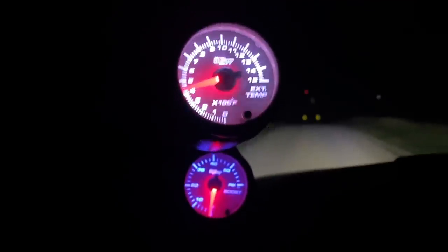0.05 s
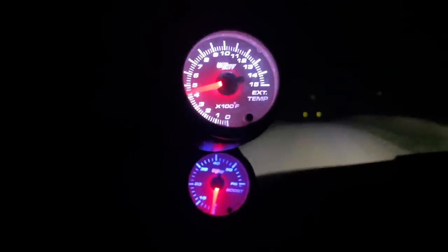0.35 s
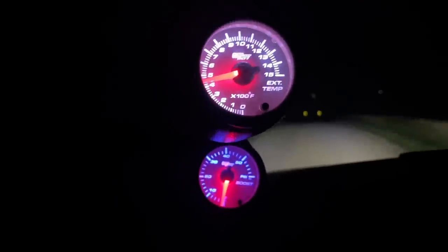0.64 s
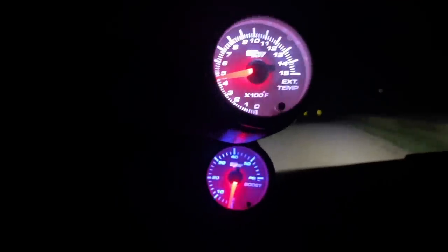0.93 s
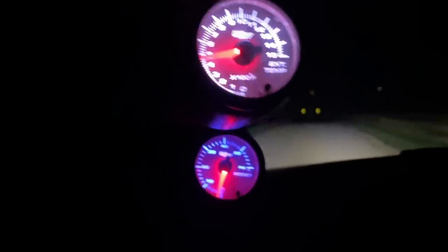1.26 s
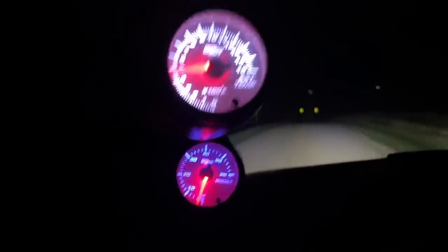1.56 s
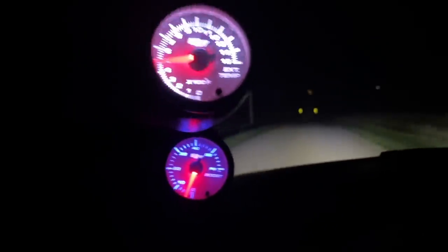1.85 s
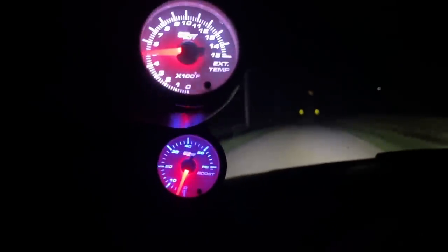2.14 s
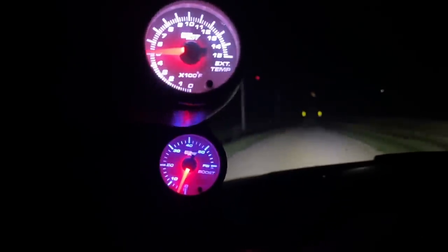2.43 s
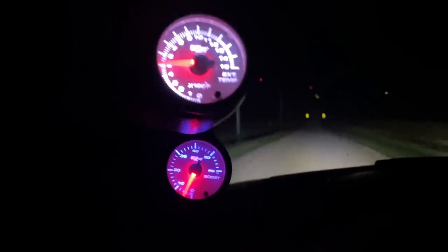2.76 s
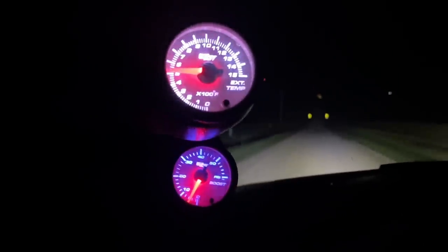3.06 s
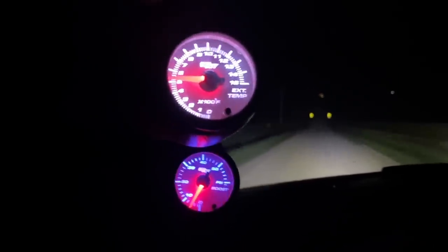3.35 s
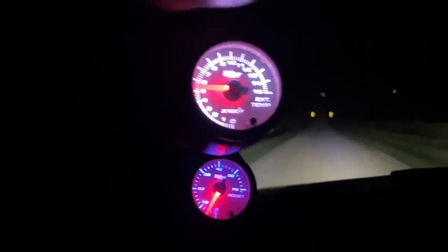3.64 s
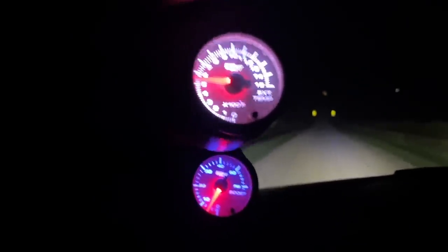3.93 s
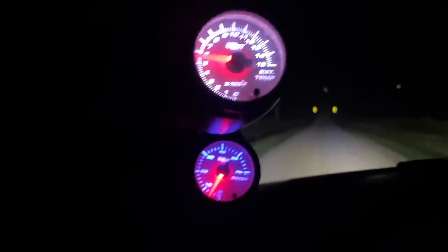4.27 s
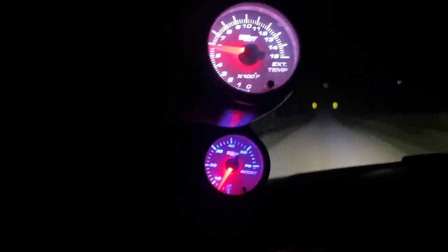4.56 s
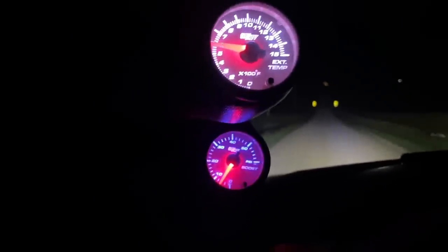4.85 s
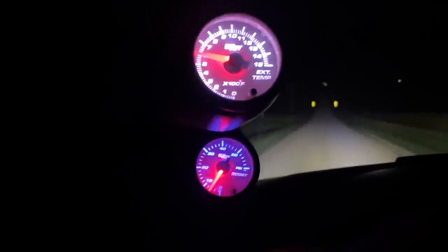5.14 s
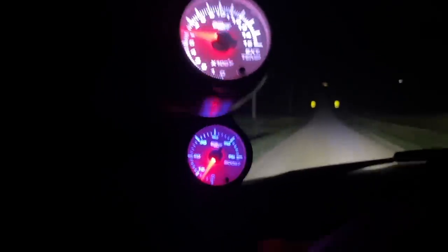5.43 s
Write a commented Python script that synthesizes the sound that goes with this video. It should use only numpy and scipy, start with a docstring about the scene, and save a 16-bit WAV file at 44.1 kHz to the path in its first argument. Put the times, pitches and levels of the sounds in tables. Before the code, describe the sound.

A diesel pickup drones deeply under load, heard from the cab over road rumble, while a faint turbo whistle climbs and levels off.

```python
"""Inside the cab of a six-cylinder turbo diesel pickup pulling along a road.
From the start the exhaust drones at the firing rate and keeps a limiter busy; unequal cylinders growl,
combustion clatters through the firewall, tyres rumble and the turbo whistle climbs. Plastic trim ticks
four times between 0.6 and 2.3 s, and rough road swells the boom near 1.5 s. The load grows while the
revs sag; near 5 s they pick up and the whistle levels off."""
import sys
import numpy as np
from scipy import signal
from scipy.fft import rfft, irfft
from scipy.io import wavfile
from scipy.ndimage import uniform_filter1d, minimum_filter1d

SR = 44100
rng = np.random.default_rng(int(sys.argv[2]) if len(sys.argv) > 2 else 0)


def unload_wav(signal):
    """Save mono or channel-first audio to the path in sys.argv[1] as 16-bit WAV at rate SR, clipped to [-1, 1]."""
    wavfile.write(
        sys.argv[1],
        SR,
        np.round(np.clip(np.atleast_2d(signal).T, -1, 1) * 32767).astype(np.int16),
    )


N = 242550
TIME_S = np.arange(N) / SR
BIN_HZ = np.maximum(np.arange(N // 2 + 1) * SR / N, 1)
CYLINDERS = 6


def from_db(db):
    """Decibels to gain."""
    return 10 ** (np.asarray(db) / 20)


def unit_rms(x):
    """Scale to unit power."""
    return x / np.sqrt(np.mean(x ** 2) + 1e-20)


def per_sample(rows):
    """Columns of a time table at every sample."""
    time_s, *columns = np.transpose(rows)
    return [np.interp(TIME_S, time_s, c) for c in columns]


def per_bin(rows):
    """Columns of a frequency table at every FFT bin, joined on a log axis."""
    hz, *columns = np.transpose(rows)
    return [np.interp(np.log(BIN_HZ), np.log(hz), c) for c in columns]


def pan(db):
    """Stereo gains for a left-minus-right level."""
    return from_db(np.array([[.5], [-.5]]) * db)


def drift(rate_hz):
    """Slow random wander, unit RMS."""
    return unit_rms(irfft(rfft(rng.standard_normal(N)) / (1 + (BIN_HZ / rate_hz) ** 2), N))


def skirts_db(low_hz, high_hz):
    """Steep roll-off either side of a band."""
    return -10 * np.log10(1 + (low_hz / BIN_HZ) ** 10 + (BIN_HZ / high_hz) ** 10)


def resonance(x, hz, width_hz):
    """Two-pole resonator, unity peak gain."""
    r = np.exp(-np.pi * width_hz / SR)
    feedback = [1, -2 * r * np.cos(2 * np.pi * hz / SR), r * r]
    return signal.lfilter(np.array([1, 0, -1]) * (1 - r * r) / 2, feedback, x)


# Cab sound field: (frequency [Hz], left-right coherence [0..1])
CAB_COHERENCE = [(60, .998), (100, .99), (180, .94), (300, .5), (500, 0), (1200, .15), (2600, .5),
                 (5000, .4), (9500, .05)]

def cab_noise(density_db=0, pan_db=0):
    """Stereo noise of a given density per Hz: coherent in the bass, diffuse above."""
    coherence, = per_bin(CAB_COHERENCE)
    mid, side = rfft(rng.standard_normal((2, N))) * np.sqrt(SR) / 2
    pair = np.sqrt(1 + coherence) * mid + np.sqrt(1 - coherence) * side * [[1], [-1]]
    return irfft(pair * from_db(density_db) * pan(pan_db), N)


# Road and wind spectrum: (frequency [Hz], relative density [dB], pan [dB])
ROAD_SPECTRUM = [(180, -48, 3), (280, -53, 2), (380, -57.5, 2.5), (520, -64.5, 5), (820, -67.5, 5),
                 (1150, -74, 0), (1700, -78, 1), (2600, -84, 2), (3400, -88, 3), (4300, -89.5, 3),
                 (7800, -96, 1.5), (10000, -93, 0), (11800, -100, 0)]

def road_and_wind(load_db):
    """Broad rush that grows as the truck pulls harder."""
    density_db, pan_db = per_bin(ROAD_SPECTRUM)
    return from_db(-.4 + .3 * load_db) * cab_noise(density_db + skirts_db(140, 12600), pan_db)


# Tyre boom spectrum: (frequency [Hz], relative density [dB])
BOOM_SPECTRUM = [(16, -56), (24, -51.5), (33, -51.5), (39, -45), (47, -34.5), (57, -34.5), (67, -30),
                 (80, -35), (92, -37), (125, -43), (175, -50.5)]
# Rough road: (time [s], half length [s], boost [dB])
ROUGH_PATCHES = [(1.547, .12, 2), (1.9, .2, 0.5), (3.5, .1, 0)]

def tyre_rumble(start_db=-2.5, rise_db_per_s=.79):
    """Tyre boom grows with road speed and swells over rough patches."""
    density_db, = per_bin(BOOM_SPECTRUM)
    boom = cab_noise(density_db + skirts_db(9, 230), pan_db=1.7)
    power = uniform_filter1d(np.mean(boom ** 2, axis=0), size=SR // 2)
    steady_boom = boom * np.sqrt(power.mean() / power)
    swell_db = sum(db * np.exp(-((TIME_S - at_s) / half_s) ** 2) for at_s, half_s, db in ROUGH_PATCHES)
    return from_db(start_db + rise_db_per_s * TIME_S + swell_db) * steady_boom


# Trim slips: (time [s], relative level [dB])
TRIM_SLIPS = [(0.612, -39), (1.6876, -36.5), (2.0517, -48), (2.2322, -45.5)]
# Trim resonances: (frequency [Hz], width [Hz], gain [dB])
TRIM_MODES = [(2900, 900, -13), (4800, 700, -15), (6400, 600, -7), (7300, 900, -5), (10000, 1700, 0)]

def trim_ticks(crack_s=.0014, rustle_s=.007, rustle_db=-10):
    """Plastic trim slips: a sharp crack and a short rustle through its resonances."""
    envelope = np.zeros(N)
    for at_s, level_db in TRIM_SLIPS:
        age_s = np.maximum(TIME_S - at_s, 0)
        decay = np.exp(-age_s / crack_s) + from_db(rustle_db) * np.exp(-age_s / rustle_s)
        envelope += (TIME_S >= at_s) * from_db(level_db) * decay
    friction = from_db(9.5) * envelope * rng.standard_normal((2, N))
    return sum(from_db(db) * resonance(friction, hz, width_hz) for hz, width_hz, db in TRIM_MODES)


def intake_hiss(centre_hz, half_width_hz=430):
    """Air rushing through the compressor: a noise band that follows shaft speed."""
    mean_hz = centre_hz.mean()
    band = cab_noise(-10 * np.log10(1 + ((BIN_HZ - mean_hz) / half_width_hz) ** 4))
    shift_turns = np.cumsum(centre_hz - mean_hz) / SR
    return unit_rms(np.real(signal.hilbert(band) * np.exp(2j * np.pi * shift_turns)))


def blade_tone(hz, jitter_hz, flutter):
    """Tone of a trembling shaft; each channel gets its own changing mix of reflections."""
    turns = np.cumsum(hz + jitter_hz * drift(33)) / SR
    paths = np.array([1 + flutter * (drift(16) + 1j * drift(15)) for _ in range(2)])
    return unit_rms(np.real(paths * np.exp(2j * np.pi * turns)))


# Intake pipe resonances: (frequency [Hz], half width [Hz], peak level [dB])
INTAKE_MODES = [(5325, 22, -57.5), (5432, 20, -58.5), (5530, 12, -62), (5665, 60, -57), (5848, 13, -52.5),
                (6080, 16, -52), (6203, 22, -52.5), (6305, 6, -55.5), (6369, 20, -52.5), (6475, 5, -58)]

def compressor_whistle(hz, floor_db=-64):
    """The whistle flares as it climbs through each resonance of the intake pipe."""
    power = sum(from_db(db) ** 2 / (1 + ((hz - mode_hz) / half_width_hz) ** 4)
                for mode_hz, half_width_hz, db in INTAKE_MODES)
    gain = np.sqrt(power + from_db(floor_db) ** 2)
    return gain * blade_tone(hz, jitter_hz=7, flutter=.27) * pan(3.6)


# Intake duct passband: (frequency [Hz], half width [Hz])
DUCT_BAND = (9720, 190)

def turbine_whistle(hz):
    """The turbine tone shows as it sweeps through a duct resonance."""
    duct_hz, half_width_hz = DUCT_BAND
    passed = 1 / np.hypot(1, (hz - duct_hz) / half_width_hz)
    return from_db(-69) * passed * blade_tone(hz, jitter_hz=45, flutter=.9)


# Compressor blade tone: (time [s], pitch [Hz])
COMPRESSOR_PITCH = [(0, 5322), (.7, 5440), (1.5, 5649), (2.03, 5784), (2.9, 6077), (3.35, 6196),
                    (4.15, 6349), (4.95, 6462), (5.5, 6485)]

def turbo(load_db):
    """One shaft drives both whistles; the intake hiss grows with load."""
    hz, = per_sample(COMPRESSOR_PITCH)
    whistles = compressor_whistle(hz) + turbine_whistle(hz * 5 / 3)
    hiss = from_db(-57 + .39 * load_db) * intake_hiss(hz - 280) * pan(5.5)
    return whistles + hiss


# Knock per cylinder, in firing order: (relative level [dB])
CYLINDER_KNOCK_DB = [2, 3.5, 3, -2, 5, -4]
# Engine block resonances: (frequency [Hz], width [Hz], relative density [dB], pan [dB])
BLOCK_MODES = [(430, 60, -58.5, 1), (645, 85, -63, 6), (825, 170, -68, 7), (1245, 90, -75.5, 0),
               (1600, 130, -80.5, 4), (1950, 160, -82, 0), (2580, 80, -79.5, 2), (4150, 120, -88, 4)]

def combustion_clatter(cycles, load_db, decay_s=.0016, scatter_db=1.1, blow_gain=.42):
    """Each firing hits the block with a blow and a short rattle, as strong as its cylinder."""
    firing = np.floor(cycles * CYLINDERS).astype(int)
    onsets = np.flatnonzero(np.diff(firing))
    knock_db = np.array(CYLINDER_KNOCK_DB)[firing[onsets] % CYLINDERS]
    knocks = np.zeros(N)
    knocks[onsets] = from_db(knock_db + scatter_db * rng.standard_normal(len(onsets)))
    r = np.exp(-1 / (decay_s * SR))
    rattle = unit_rms(signal.lfilter([1], [1, -2 * r, r * r], knocks)) * cab_noise()
    force = rattle + blow_gain * unit_rms(knocks) * np.sqrt(SR / 2)
    block = 0
    for hz, width_hz, db, pan_db in BLOCK_MODES:
        stage_width_hz = 1.5 * width_hz  # two stages in series narrow the band
        ring = resonance(resonance(force, hz, stage_width_hz), hz, stage_width_hz)
        block += from_db(db) * pan(pan_db) * ring
    return from_db(-.8 + load_db) * block


# Growl lines, the 72nd multiple being gear whine: (multiple of the four-stroke cycle rate, relative level [dB],
# pan [dB])
GROWL_LINES = [(4, -29, 2), (7, -34, 1), (9, -41, 4), (10, -47, 5), (11, -45, 4), (13, -41, 5),
               (14, -47, 8), (15, -39, 10), (17, -41, 1), (19, -46, 8), (21, -49, 7), (24, -46, -2),
               (30, -54, 9), (36, -55, 5), (39, -58, 4), (42, -57, 4), (48, -57, 4), (72, -62, 0)]

def cylinder_growl(cycles, load_db, roughness=.27):
    """Unequal cylinders add lines at multiples of the cycle rate, and the timing gears whine at the 72nd; no
    two cycles burn alike."""
    growl = 0
    for multiple, level_db, pan_db in GROWL_LINES:
        burn = (1 + roughness * (drift(1.2) + 1j * drift(6.6))) / np.sqrt(1 + 2 * roughness ** 2)
        turns = multiple * cycles + rng.random()
        line = np.sqrt(2) * np.real(burn * np.exp(2j * np.pi * turns))
        growl += line * from_db(level_db) * pan(pan_db)
    return from_db(-.3 + .7 * load_db) * growl


# Cab response to the exhaust, null at 323 Hz: (frequency [Hz], relative level [dB])
EXHAUST_RESPONSE = [(103, -8.5), (112, -8), (206, -17.5), (212.5, -13.5), (218, -16.5), (223, -20),
                    (309, -24.5), (315, -28), (320, -36), (323, -45.5), (327, -39.5), (333, -36.5)]
# Balance of harmonics 1-3, each with its own standing wave in the cab: (pan [dB])
HARMONIC_PAN_DB = [1.45, 7.5, -2.2]

def exhaust_drone(cycles, firing_hz, drone_offset_s=.00073, waver_db=.32, lag_rad=.43):
    """Low exhaust drone at the firing rate: three harmonics, the upper ones lagging."""
    response_hz, response_db = np.transpose(EXHAUST_RESPONSE)
    firings = CYLINDERS * cycles - drone_offset_s * firing_hz
    drone = 0
    for harmonic, pan_db in enumerate(HARMONIC_PAN_DB, start=1):
        level_db = np.interp(harmonic * firing_hz, response_hz, response_db) - waver_db * drift(14)
        line = -np.sqrt(2) * np.cos(2 * np.pi * harmonic * firings - (harmonic - 1) * lag_rad)
        drone += line * from_db(level_db) * pan(pan_db)
    return from_db(-.18) * drone


# Engine speed: (time [s], firing rate [Hz])
FIRING_RATE = [(0, 104.7), (.25, 104.8), (1.4, 108.1), (1.72, 107.3), (2.0, 108.1), (2.2, 109.4),
               (2.4, 109.3), (2.7, 106.2), (3.35, 104.8), (4.2, 103.5), (4.78, 102.8), (4.97, 104.9),
               (5.25, 111.2), (5.5, 112.2)]
# Engine load: (time [s], level [dB])
ENGINE_LOAD = [(0, -1.8), (1.2, -1.7), (3.0, 0.7), (5.5, 3.5)]

def scene():
    """Engine, road, trim and turbo from the driver's seat."""
    firing_hz, = per_sample(FIRING_RATE)
    load_db, = per_sample(ENGINE_LOAD)
    cycles = np.cumsum(firing_hz) / SR / CYLINDERS
    exhaust = exhaust_drone(cycles, firing_hz) + cylinder_growl(cycles, load_db)
    clatter = combustion_clatter(cycles, load_db)
    background = road_and_wind(load_db) + trim_ticks() + tyre_rumble()
    return background + turbo(load_db) + clatter + exhaust


def limiter(x, ceiling=.99, release_db_per_s=45):
    """Turns both channels down just ahead of each peak, then recovers."""
    over_db = 20 * np.log10(np.maximum(np.abs(x).max(axis=0) / ceiling, 1))
    ramp_db = release_db_per_s * TIME_S
    gain_db = ramp_db - np.maximum.accumulate(over_db + ramp_db)
    held_db = minimum_filter1d(gain_db, size=241)
    smooth_db = uniform_filter1d(uniform_filter1d(held_db, size=121), size=121)
    return x * from_db(smooth_db)


def record(dry):
    """Peak limiter, then a steep low-pass."""
    stop_hz = 13200
    lowpass = signal.cheby2(12, 50, stop_hz, fs=SR, output="sos")
    return signal.sosfilt(lowpass, limiter(dry))


dry = scene()
out = record(dry)
unload_wav(out)
```